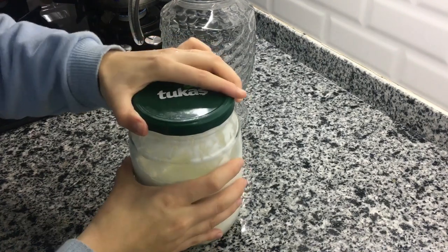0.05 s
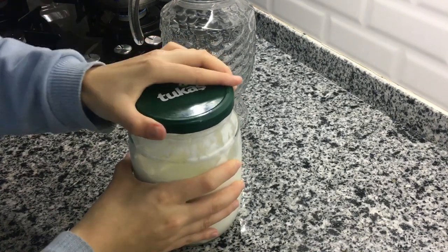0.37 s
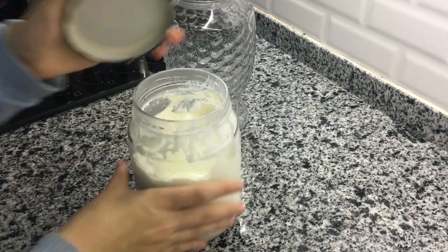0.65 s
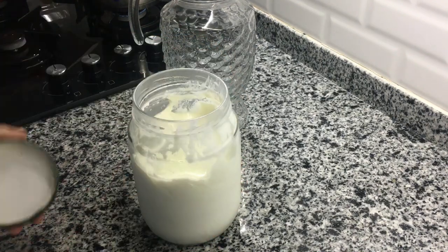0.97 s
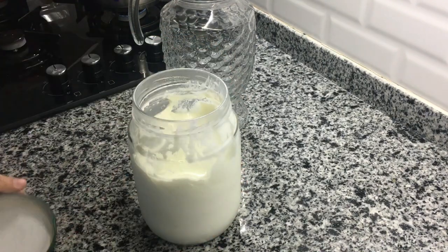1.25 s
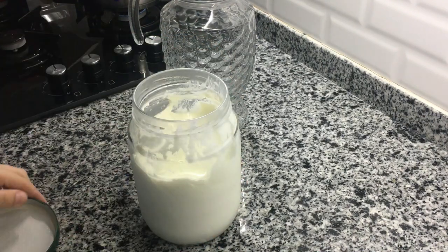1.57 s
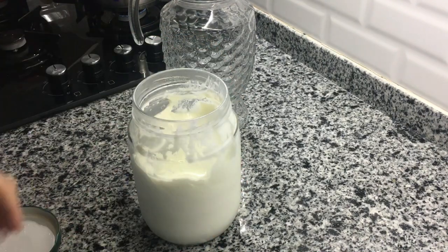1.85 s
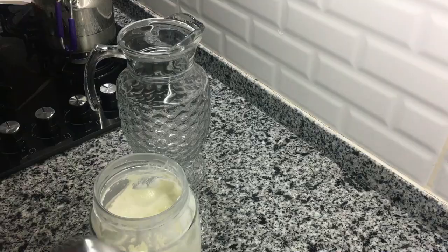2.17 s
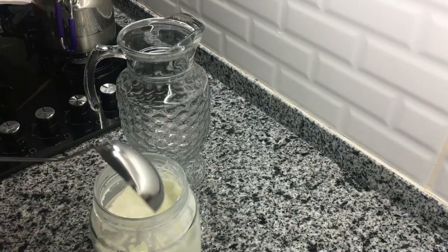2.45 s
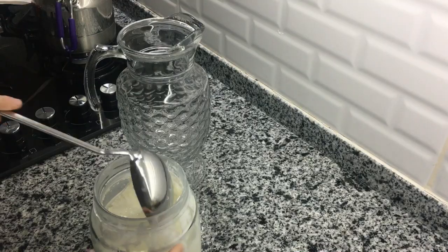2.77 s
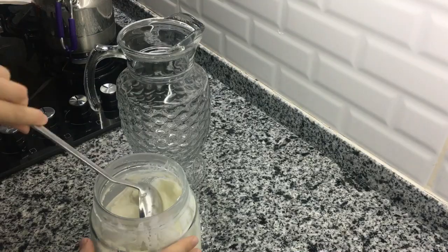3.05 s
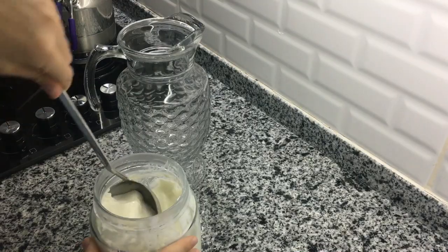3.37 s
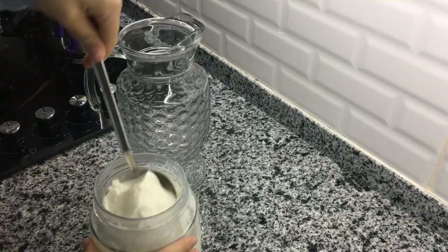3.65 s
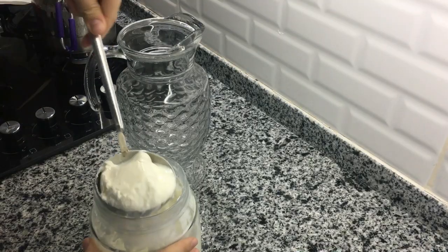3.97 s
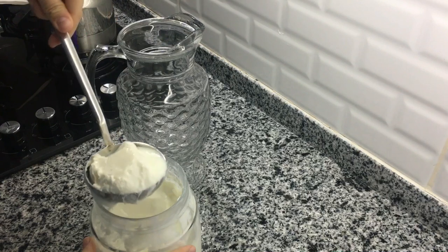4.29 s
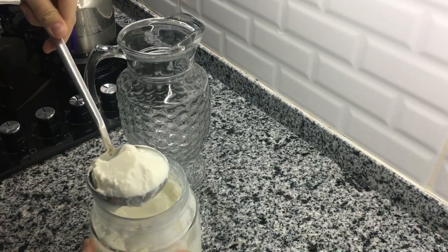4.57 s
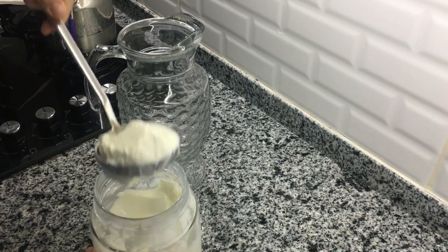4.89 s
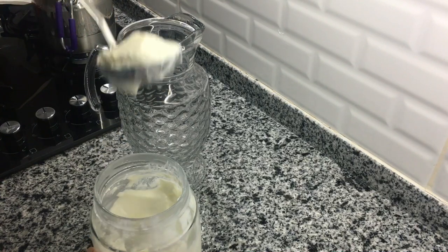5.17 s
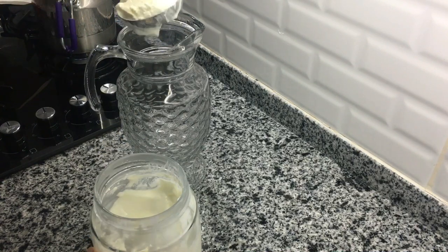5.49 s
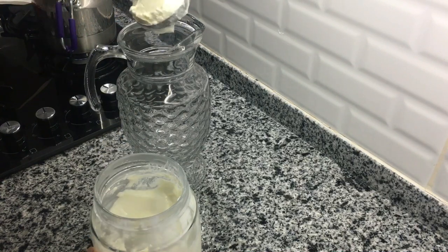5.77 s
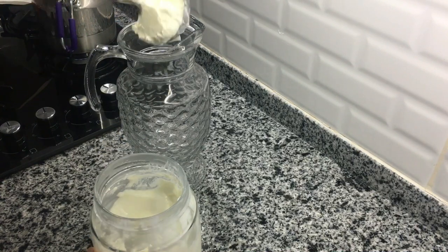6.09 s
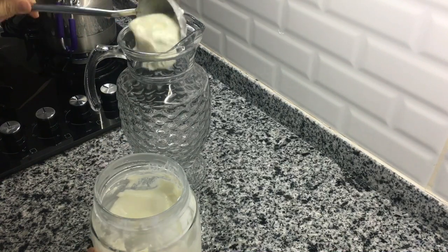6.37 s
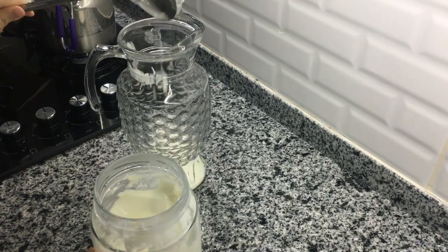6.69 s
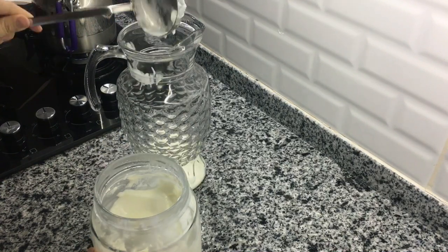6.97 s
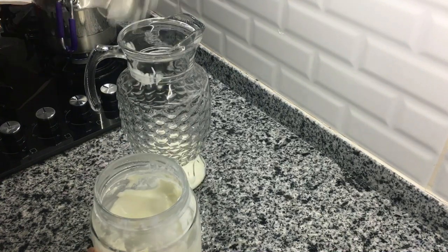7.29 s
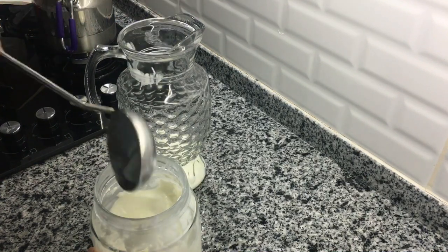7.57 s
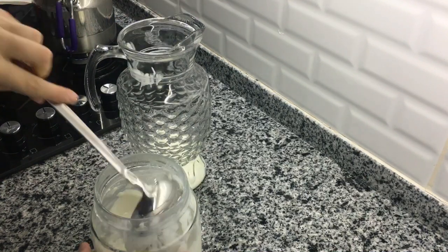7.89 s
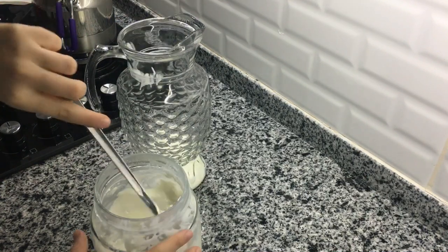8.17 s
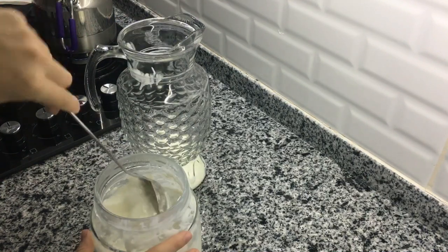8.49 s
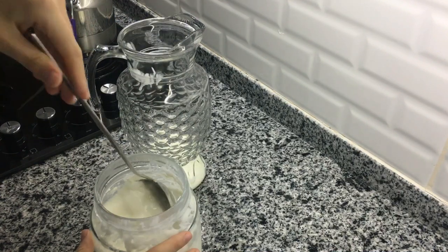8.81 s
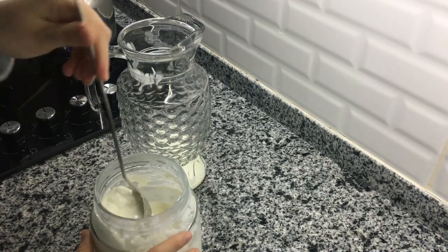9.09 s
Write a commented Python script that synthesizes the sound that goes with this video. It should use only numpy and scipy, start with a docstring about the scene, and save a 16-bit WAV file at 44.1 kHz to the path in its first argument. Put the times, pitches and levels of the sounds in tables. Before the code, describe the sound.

A jar lid pops and clatters down in a kitchen; a metal spoon knocks in the glass, and yoghurt plops into a pitcher.

```python
"""A steel serving spoon knocks and scrapes in a glass jar of yoghurt, in a tiled kitchen.
Each knock is a short clack, and then steel and glass ring on; each scrape is a run of tiny slips.
First the jar pops open and its thin tin lid clatters onto the stone counter. After the scooping,
a dollop slaps into an empty pitcher, which booms and rings, and the spoon goes back in the jar.
The tiles echo, and an appliance motor hums faintly throughout."""
import sys
import numpy as np
from scipy import signal
from scipy.fft import rfft, irfft, next_fast_len
from scipy.io import wavfile

SR = 44100
rng = np.random.default_rng(int(sys.argv[2]) if len(sys.argv) > 2 else 0)


def inscribe(sig):
    """Save sig as 16-bit PCM at rate SR to the path in sys.argv[1].

    A 1-D sig is mono; a 2-D sig holds one channel per row.
    Samples are clipped to [-1, 1] before scaling.
    """
    pcm = np.round(np.clip(np.atleast_2d(sig).T, -1, 1) * 32767)
    wavfile.write(sys.argv[1], SR, pcm.astype(np.int16))


N = 403074
BLOW_SIZE = 20480   # samples in one blow (a single hit) as it dies away
TIME, AGE = np.arange(N) / SR, np.arange(BLOW_SIZE) / SR   # seconds into the scene, and into a blow

# five pitch bands, called thud, knock, low ring, high ring and tick: (band edge [Hz])
BAND_EDGES = [100, 450, 1200, 2500, 4500, 16000]
# the middle of each band: (distance from the low ring [octaves])
BAND_OCTAVES = np.array([-3, -1.2, 0, 1, 2.3])
# the kitchen's echo; t60 is the time a sound takes to fade by 60 dB: (frequency [Hz], t60 [s])
KITCHEN_DECAY = [(100, 1), (400, 0.62), (1500, 0.49), (3000, 0.38), (6000, 0.3), (9000, 0.25),
                 (15000, 0.18)]
# the motor's steady tones: (frequency [Hz], relative level [dB])
HUM_TONES = [(48.4, -70.5), (96.9, -68), (220.7, -74), (296.1, -68), (393.0, -80.5), (985.1, -85.5),
             (1034, -81.5), (1674, -80.5), (2616, -82), (3790, -89.5)]

# A "colour" says how strong a noise is from bass to treble: (frequency [Hz], relative level [dB])
AIR_COLOUR = [(15, -39.5), (25, -7.5), (53, -1.5), (70, -13.5), (102, -2), (170, -7.5), (217, -5.5),
              (249, -10.5), (301, -2.5), (363, -13.5), (394, -9.5), (591, -16.5), (677, -15.5),
              (1650, -23.5), (5000, -33), (16000, -40)]   # room air
SLAP_COLOUR = [(100, 4), (200, 4.5), (400, -8.5), (800, -5.5), (1500, -9.5), (2700, -12.5), (4000, -10),
               (5700, -5), (6700, -1), (7500, -4), (8200, 1), (9400, 0.5), (10200, -18), (12000, -6.5),
               (16000, -10)]   # the dollop landing
LID_CLACK_COLOUR = [(50, -9), (100, 2), (250, -1.5), (375, -5), (490, -9), (900, 3), (1450, 2.5),
                    (1850, 1.5), (2150, 3.5), (2550, -2.5), (3020, 5.5), (3350, -1.5), (3650, 2),
                    (4200, -1.5), (5000, 0), (8500, -7), (10300, -15), (12000, -12.5), (16000, -21)]   # a hit on the lid
SKID_COLOUR = [(200, -20.5), (900, -8.5), (1500, 3.5), (2400, -4.5), (3400, 1), (5000, -7), (8500, -14.5),
               (10300, -22.5), (16000, -26)]   # the lid's edge skidding on stone
DRAG_COLOUR = [(120, 9), (300, 20), (450, -8), (700, 11.5), (1100, -0.5), (1500, 1), (2400, -20.5),
               (4000, -20.5), (7000, -19), (16000, -32.5)]   # dragging along the glass
GRATING_COLOUR = [(50, -7.5), (120, 3), (330, 5), (470, -4), (650, 2.5), (1000, -3), (1500, -5),
                  (2300, 0.5), (4400, -5), (6000, 2), (7800, -5), (9700, -2), (10500, -15), (11800, -1),
                  (16000, -16)]   # the spoon's edge grating over the rim
JAR_CLACK_COLOUR = [(50, -8), (120, 5), (205, 1), (330, 6.5), (470, -3.5), (650, 5), (1000, -1), (2300, -3),
                    (3400, -3.5), (4400, -5.5), (6000, -2.5), (7800, -9.5), (9700, -5.5), (10400, -16),
                    (11600, -10.5), (16000, -19.5)]   # a hit on the jar

# A "mode" is one of the tones an object rings with: (frequency [Hz], relative level [dB], t60 [s])
PITCHER_MODES = [(66, -40.5, .3), (110, -30.5, .28), (148.8, -33.5, 0.25), (1109, -35, 0.17),
                 (1800, -33, .29), (3990, -30.5, .08), (5350, -39.5, 0.2), (8290, -29, .14)]   # the empty pitcher's air and glass
BUMP_MODES = [(105, -12, .22), (165, -6.5, .18), (255, -1, 0.17), (345, -3, .1), (637, -1.5, 0.06),
              (875, -6, 0.058), (1114, -8, .06)]   # the jar rocking dully on the counter
SPOON_MODES = [(1919, -13.5, 0.14), (2054, -18.5, 0.38), (2791, -21.5, 0.099), (2930, -15, .07),
               (3140, -12, .07), (3035, -4, 0.12), (3046, -3.5, 0.11), (3100, -17, 0.25), (3062, -16, .21),
               (3008, -17, .21), (3230, -18, 0.13), (5260, -10.5, .09), (5280, -10.5, .09),
               (5330, -18, 0.2), (5830, -23, 0.19), (6050, -17.5, 0.12), (6244, -21.5, .14),
               (6310, -25.5, .14), (6930, -37.5, .18), (8230, -29.5, 0.18), (11366, -14, 0.061),
               (11536, -18, 0.066), (11851, -17.5, 0.065), (12110, -18.5, 0.064), (12946, -19, .06)]   # the steel spoon
# modes that depend on the spot hit: (frequency [Hz], relative level [dB], t60 [s], best spots [names])
LID_MODES = [(388, -14.5, 0.24, "face"), (609, -26.5, 0.22, "face edge"), (1114, -12, 0.08, "skirt edge"),
             (1364, -5, .08, "skirt"), (1423, -0.5, .075, "edge"), (1460, -16.5, 0.24, "face edge"),
             (1467, -0.5, .105, "face"), (1490, -10, .07, "face edge"), (1723, -9.5, 0.085, "face"),
             (2133, -5.5, 0.079, "skirt edge"), (2340, -3, 0.072, "skirt"), (2840, -6, .065, "face edge"),
             (2910, -8, .07, "face"), (3015, 0.5, .065, "edge skirt face"), (3079, 5.5, 0.084, "face"),
             (3110, -4, .075, "skirt face"), (3571, -8, 0.11, "face skirt"), (3630, -10, 0.12, "edge"),
             (3680, -9.5, .13, "face skirt"), (3800, -4.5, 0.078, "skirt"), (4158, -13.5, .12, "face"),
             (4581, -11, .09, "edge"), (4640, -8.5, .1, "face"), (4766, -11, .07, "skirt"),
             (5011, -9, 0.089, "face"), (5220, -10.5, 0.07, "face skirt"), (5920, -2, 0.12, "lug"),
             (6860, -10.5, .1, "face"), (7400, -10, 0.084, "lug"), (8260, -18, 0.061, "face edge"),
             (8669, -11.5, .14, "lug"), (12200, -20, .06, "skirt")]   # the tin lid
JAR_MODES = [(622, -1.5, 0.1204, "base"), (646.6, -5.5, 0.099, "rim shoulder side wall mouth"),
             (890, -8.5, 0.102, "shoulder base"), (1118, -7, 0.12, "shoulder"),
             (1423, -4.5, 0.1404, "neck"), (1464, -2.5, .27, "rim lip"),
             (1512, 2, .22, "shoulder base mouth lip"), (1547, -2.5, .18, "neck base"),
             (1693, -4, 0.067, "rim"), (1999, -3, .13, "neck"), (2057, -4, .33, "side"),
             (2186, -3.5, .11, "base"), (2300, -1.5, 0.051, "wall rim"), (2410, 1, 0.045, "rim"),
             (2640, -2.5, .09, "base"), (2950, -4.5, 0.05, "wall lip rim"), (3046, -1.5, .09, "base"),
             (3074, -2, 0.16, "neck shoulder"), (3113, -0.5, .08, "neck base"), (3260, -3, .054, "wall"),
             (3600, -5, .07, "wall"), (3809, 3.5, .08, "rim"), (4037, 1, .065, "base"),
             (4130, -9.5, .07, "wall neck"), (4520, -2, .06, "rim"), (4723, -7, .07, "base"),
             (4831, -5, .085, "shoulder"), (5150, -7, .09, "neck wall"), (5555, -1.5, .075, "base"),
             (5862, -9, 0.097, "shoulder base"), (6030, -4, .09, "rim"),
             (6040, -3, .1, "neck shoulder base"), (6290, 1, .085, "base"), (6390, -2.5, .07, "base"),
             (6659, -5.5, .07, "rim"), (7000, -7.5, .08, "shoulder"), (7100, -7, .07, "rim"),
             (7221, -7, .07, "base"), (8357, -6.5, 0.0698, "base"), (8530, -6.5, 0.089, "shoulder base"),
             (8700, -3, .08, "rim"), (9210, -9, 0.091, "shoulder"), (9275, -10.5, 0.073, "shoulder"),
             (9650, -6.5, .1, "rim shoulder"), (9976, -10.5, .07, "base shoulder"),
             (10090, -10.5, .07, "rim"), (11430, -11.5, .07, "rim shoulder"), (11680, -4, .085, "rim"),
             (11860, -8.5, .06, "rim neck"), (12240, -12.5, .08, "rim shoulder base"),
             (13606, -11, 0.0801, "neck"), (14088, -15, .06, "rim base")]   # the glass jar, damped by its filling
NEAR_NODE_DB = -17   # a mode is this much weaker when hit anywhere else, where it barely moves

# the dollop's slap in each band, from thud to tick: (level [dB])
SLAP_BAND_DB = [-40.5, -47, -41.5, -35.5, -24.5]
# air pockets bursting under the dollop: (time [s], starting pitch [Hz], level [dB])
BUBBLES = [(6.699, 1497, -21.5), (6.705, 1750, -20), (6.719, 2120, -29)]

# the loosened lid bumping the held jar: (time [s], level [dB])
BUMPS = [(0.207, -10), (0.446, -16.5), (0.668, -21.5)]
# the lid twisted off, then set down on stone: (time [s], part hit [name], strength [dB],
# hardness [dB per octave], extra tick [dB], chatter time [s], extra ring [dB])
LID_BLOWS = [(0.0968, "edge", -64.5, -4, -19, .0025, -2), (0.1801, "edge", -41.5, 0, -9.5, 0.004, 3),
             (0.197, "skirt", -48.5, -3.5, -4.5, 0.0098, -7), (0.4246, "skirt", -57.5, -4, -11.5, .006, -4),
             (0.439, "face", -56, -3.5, -24, .014, -3.5), (0.666, "skirt", -65.5, -6, -6, 0.013, -16),
             (0.908, "skirt", -60, -1, -13, .0017, -17), (1.215, "edge", -38.5, 8, -7, .003, -3.5),
             (1.3329, "lug", -54.5, 1.5, 3.5, .003, 4), (1.38, "face", -33, 9, -10, .0064, 3.5),
             (1.388, "face", -40.5, 6.5, -7.5, .003, 1), (1.398, "face", -35.5, 9, -8.5, .004, 1),
             (1.411, "face", -38.5, 6.5, -4.5, .006, -1), (1.628, "skirt", -47, 6, -3, .0054, -6),
             (1.637, "skirt", -43.5, 6.5, -8, .0054, -5), (1.6708, "skirt", -42.5, 5.5, 2, .003, -5),
             (1.6792, "skirt", -38, 5.5, -5.5, 0.0017, -0.5), (2.169, "skirt", -70.5, 7, -4, 0.049, -25.5)]
LID_BALANCE_DB = [-1.5, -4.5, -1, -2.5]   # bands from thud to high ring, at zero hardness
LID_TILT_TOP_OCTAVES = 0.77   # hardness adds no further lift beyond this far above the low ring
LID_OFF_S, GRIPPED_RING_SHARE = .8, 0.22   # until the lid is off, the hand shortens its ring

# the spoon sucking free or sliding down the wall:
# (time [s], level [dB], rise [s], fall [s], starting pitch [Hz], final pitch [Hz])
SQUEAKS = [(3.535, -41.5, 0.078, 0.077, 742, 622), (7.927, -43, 0.011, 0.1, 1515, 1200)]
# spoon strokes through yoghurt along the glass: (time [s], level [dB], rise [s], hold [s], fall [s])
STROKES = [(3.08, -59, 0.25, .37, 0.22), (7.797, -48, 0.053, 0.082, 0.094), (8.0, -58, .04, 0.21, 0.48)]
# how the jar answers at each named place: (glass ring [dB], extra knock [dB], ring time kept [share])
JAR_PLACES = {"rim": (4.4, 0.44, 0.83), "neck": (5.7, -6, 0.86), "lip": (8, -4, 0.43),
              "mouth": (2.75, 1.6, 0.88), "shoulder": (6.1, 1.6, 0.89), "side": (1, 0.95, 0.83),
              "wall": (2, -1.5, 0.63), "base": (5, 0, 0.79)}
# knocks on the jar, mostly from the spoon; at 2.9 s a soft low thud as the hand grips it.
# Yoghurt softens a hit, and a downward push thuds on the counter:
# (time [s], place [name], strength [dB], hardness [dB per octave], extra thud [dB], chatter time [s],
# extra steel ring [dB], edge brightness [dB per octave])
JAR_BLOWS = [(2.487, "rim", -34.5, 2, -3.5, 0.0045, -13.5, 6.5),
             (2.5914, "rim", -43.5, 3, 0, 0.0037, -11.5, 4), (2.9042, "wall", -74, 0, 21, 0.0027, -13, -7),
             (3.0513, "neck", -38, -1, -5.5, .0042, 2, 1.5), (3.237, "neck", -51, .5, 2, 0.0059, -9, -5.5),
             (3.2665, "wall", -53, -5, -9, .012, 2.5, -13), (3.3846, "lip", -52, -6, -9, 0.0036, -8.5, -4),
             (3.4502, "lip", -55.5, -8.5, -10, 0.0018, -15, -5),
             (3.478, "lip", -55, -5, -4, 0.0018, -4, -4), (3.602, "mouth", -51.5, -7, -9, .018, -21, -8),
             (3.6437, "shoulder", -58, -3.5, 5, 0.0036, -2, -2),
             (3.723, "base", -56.5, -4, 7.5, 0.0097, 2, -14),
             (3.8135, "wall", -67.5, 3.5, -6, 0.0019, -4, -1),
             (4.0459, "mouth", -29, -1.13, -13, 0.0052, 11, 1),
             (7.7622, "shoulder", -34.5, -1.5, -5.5, 0.0039, -17.5, 3.5),
             (7.9302, "side", -57, -2.5, 0, 0.01, -4, -19), (7.955, "side", -55.5, -3.5, -2, 0.011, -9, -8),
             (7.9868, "side", -52, -8.5, 3.5, 0.015, -14, -9), (8.088, "rim", -72.5, 3, -3, .004, -20, 17),
             (8.106, "wall", -48, -12, -10, 0.0021, -22, -3), (8.14, "wall", -63, -2, 9, 0.0065, -19, 9),
             (8.284, "wall", -45.5, -3, -4.5, 0.0024, -8, -16),
             (8.671, "wall", -58, -5, 1, 0.0065, -20, -2), (9.0415, "base", -39, 2, -10, 0.0076, -13, -1.5),
             (9.101, "base", -34.5, .9, -13.5, 0.0061, -17, -2)]
JAR_BALANCE_DB = [-7.5, -0.5, 3, -0.5]   # bands from knock to tick
STEEL_BAND_SHIFT = [-0.26, -0.033, 0.46, -0.039]   # dB added to those bands per dB of extra steel ring
STEEL_DB_PER_DOUBLING = 79.5   # a freely bouncing spoon rings longer: this much extra doubles its t60


def from_db(db):
    """Turn decibels into a number to multiply a sound by."""
    return 10 ** (np.asarray(db) / 20)


def rms_one(sound):
    """Scale a sound so its average size (rms) is 1."""
    return sound / np.sqrt(np.mean(sound ** 2) + 1e-30)


def energy_one(sound):
    """Scale a sound so its total energy is 1."""
    return rms_one(sound) / np.sqrt(len(sound))


def at_hz(table, hz):
    """Look up a frequency in a table, blending between rows on a pitch scale."""
    table = np.array(table)
    return np.interp(np.log(np.maximum(hz, 1)), np.log(table[:, 0]), table[:, 1])


def fade(t60):
    """A curve that starts at 1 and falls by 60 dB every t60 seconds."""
    return np.exp(-np.log(1000) * AGE / max(t60, 1e-4))


def swell(time, start_s, level_db, rise_s, hold_s, fall_s):
    """The loudness of one movement: it rises, holds and falls."""
    corners = start_s + np.cumsum([0, rise_s, hold_s, fall_s])
    return from_db(level_db) * np.interp(time, corners, [0, 1, 1, 0])


def noise(colour, size):
    """Random noise with the given colour."""
    gain = from_db(at_hz(colour, np.fft.rfftfreq(size, 1 / SR)))
    return rms_one(irfft(rfft(rng.standard_normal(size)) * gain, size))


def through(sound, response):
    """Let every sample of a sound set off a response, such as an echo."""
    return signal.oaconvolve(sound, response)[:len(sound)]


def with_echo(sound, echo, room_db):
    """A sound plus the room's answer to it."""
    return sound + from_db(room_db) * through(sound, echo)


def add(track, start_s, sound):
    """Mix a sound into the track at the given time."""
    start = round(start_s * SR)
    track[start:start + len(sound)] += sound[:N - start]


def chatter(length_s, per_s, strength, first):
    """A first touch, then tiny random bounces that die away."""
    touches = (rng.random(BLOW_SIZE) < per_s / SR) * rng.normal(0, strength, BLOW_SIZE)
    touches *= np.exp(-(AGE / length_s) ** 2)
    touches[0] = first
    return touches


def clack(colour, t60, rise_s, touches):
    """Many short-lived tones blur into a burst of noise; reflections off the counter swell it quickly."""
    one_touch = fade(t60) * (1 - fade(rise_s))
    energy = through(touches ** 2, one_touch ** 2)
    return energy_one(noise(colour, BLOW_SIZE) * np.sqrt(np.abs(energy)))


def modes_at(modes, spot):
    """An object's modes when hit at one spot: some ring fully, the rest weakly."""
    return [(hz, level_db + (0 if spot in best_spots else NEAR_NODE_DB), t60)
            for hz, level_db, t60, best_spots in modes]


def ringing(modes, touches, spread_db, pitch=1, t60_scale=1):
    """Each mode gathers energy from the touches and fades; modes close in pitch throb together."""
    out, energy = np.zeros(BLOW_SIZE), touches ** 2 + 1e-18
    for hz, level_db, t60 in modes:
        t60 *= t60_scale
        size = int((t60 + .05) * SR)
        kept_per_sample = np.exp(-2 * np.log(1000) / (t60 * SR))
        swing = np.sqrt(signal.lfilter([1], [1, -kept_per_sample], energy[:size]))
        tone = np.sin(2 * np.pi * hz * pitch * AGE[:size])
        out[:size] += from_db(level_db + spread_db * rng.normal()) * swing * tone
    return energy_one(out)


def hollow_note(from_hz, to_hz, level_db, t60, glide_t60):
    """Enclosed air rings briefly; its pitch can slide as its opening changes."""
    hz = to_hz + (from_hz - to_hz) * fade(glide_t60)
    return from_db(level_db) * fade(t60) * (1 - fade(0.008)) * np.sin(2 * np.pi * np.cumsum(hz) / SR)


def set_bands(blow, levels_db):
    """Turn each band up or down towards the wanted level for the blow's first 40 ms."""
    size = int(.04 * SR)
    hz, edges = np.fft.rfftfreq(BLOW_SIZE, 1 / SR), np.array(BAND_EDGES)
    power = 2 * np.abs(rfft(blow[:size], BLOW_SIZE)) ** 2 / (size * BLOW_SIZE)
    own_db = 10 * np.log10(np.histogram(hz, edges, weights=power)[0] + 1e-20)
    flat_ends_hz = np.column_stack([edges[:-1] * 1.15, edges[1:] / 1.15]).ravel()
    gain_table = np.column_stack([flat_ends_hz, np.repeat(levels_db - own_db, 2)])
    log_gain = np.log(from_db(at_hz(gain_table, hz)))
    # a "minimum phase" filter, so nothing sounds before the hit
    cepstrum = irfft(log_gain)[:BLOW_SIZE // 2]
    return irfft(rfft(blow) * np.exp(2 * rfft(cepstrum, BLOW_SIZE) - cepstrum[0]))


def air_and_hum(air_db, hum_gain_db, waver_radians):
    """Steady room air and the slightly wavering tones of a motor."""
    out = from_db(air_db) * noise(AIR_COLOUR, next_fast_len(N))[:N]
    step_times = np.linspace(0, TIME[-1], 60)
    for hz, level_db in HUM_TONES:
        wander = np.interp(TIME, step_times, np.cumsum(rng.normal(0, waver_radians, len(step_times))))
        out += from_db(level_db + hum_gain_db) * np.sqrt(2) * np.sin(2 * np.pi * hz * TIME + wander)
    return out


def kitchen_echo(build_s):
    """Tiles and stone scatter sound into an echo that builds up, then dies, treble first."""
    hz = np.fft.rfftfreq(BLOW_SIZE, 1 / SR)
    white = np.exp(2j * np.pi * rng.random(len(hz)))
    edges = np.r_[0, np.geomspace(150, SR / 2, 12)]
    tail = sum(irfft(white * (hz >= low) * (hz < high)) * fade(at_hz(KITCHEN_DECAY, (low + high) / 2))
               for low, high in zip(edges, edges[1:]))
    return energy_one(tail * (1 - np.exp(-AGE / build_s)))


def arm_swish(start_s, level_db, start_hz, sink_octaves_per_s, width_octaves):
    """A dull rustle as the arm swings over; it sinks in pitch as the movement slows."""
    out, age = np.zeros(N), TIME[:SR]
    loudness = swell(age, 0, level_db, rise_s=0.14, hold_s=0.061, fall_s=0.6)
    centre_hz = start_hz * 2 ** (-sink_octaves_per_s * age)
    for hz in (70, 140, 280, 560, 1120):
        octave = signal.butter(2, [hz / np.sqrt(2), hz * np.sqrt(2)], "band", fs=SR, output="sos")
        rustle = rms_one(signal.sosfilt(octave, rng.standard_normal(SR)))
        off_centre = np.log2(hz / centre_hz) / width_octaves
        add(out, start_s, loudness * rustle / (1 + off_centre ** 2))
    return out


def pitcher(echo, start_s, bubble_rise, bubble_t60, room_db):
    """Air pockets plop from under the dollop, rising in pitch, and the pitcher booms and rings."""
    out = np.zeros(N)
    for burst_s, hz, level_db in BUBBLES:
        add(out, burst_s, hollow_note(hz, hz * bubble_rise, level_db, bubble_t60, bubble_t60))
    for hz, level_db, t60 in PITCHER_MODES:
        add(out, start_s, hollow_note(hz, hz, level_db, t60, t60))
    return with_echo(out, echo, room_db)


def dollop(echo, start_s, slap_t60, room_db):
    """Yoghurt slaps the pitcher's floor in a quick spatter."""
    out = np.zeros(N)
    spatter = chatter(length_s=0.0039, per_s=2000, strength=0.83, first=.6)
    slap = clack(SLAP_COLOUR, slap_t60, rise_s=.012, touches=spatter)
    add(out, start_s, set_bands(with_echo(slap, echo, room_db), SLAP_BAND_DB))
    return out


def jar_bumps(echo, room_db):
    """Soft knocks on the held jar wake only its lowest tones."""
    out = np.zeros(N)
    for start_s, level_db in BUMPS:
        touches = chatter(length_s=0.0075, per_s=680, strength=.8, first=.4)
        add(out, start_s, from_db(level_db) * ringing(BUMP_MODES, touches, spread_db=2.5, pitch=0.99))
    return with_echo(out, echo, room_db)


def seal_pop(echo, start_s, room_db):
    """The seal lets go with a hollow pop."""
    out = np.zeros(N)
    add(out, start_s, hollow_note(from_hz=359, to_hz=389, level_db=-19.5, t60=0.086, glide_t60=0.11))
    return with_echo(out, echo, room_db)


def lid_clatter(echo, clack_t60, ring_db, clack_room_db, ring_room_db):
    """The thin lid clacks and rings on glass and stone; a harder hit gives less thud and more ring."""
    out = np.zeros(N)
    for start_s, part, strength_db, hardness, tick_db, chatter_s, extra_ring_db in LID_BLOWS:
        touches = chatter(chatter_s, per_s=1000, strength=0.79, first=0.88)
        hit = clack(LID_CLACK_COLOUR, clack_t60, rise_s=.002, touches=touches)
        ring_share = GRIPPED_RING_SHARE if start_s < LID_OFF_S else 1
        tin = ringing(modes_at(LID_MODES, part), touches, spread_db=3.5, t60_scale=ring_share)
        ring = from_db(ring_db + extra_ring_db) * tin
        room = through(from_db(clack_room_db) * hit + from_db(ring_room_db) * ring, echo)
        tilt_db = hardness * np.minimum(BAND_OCTAVES[:-1], LID_TILT_TOP_OCTAVES)
        levels_db = strength_db + np.r_[LID_BALANCE_DB + tilt_db, tick_db]
        add(out, start_s, set_bands(hit + ring + room, levels_db))
    return out


def wet_squeaks(settle_s, width_share):
    """Wet rubbing makes a rough note that falls as the gap behind the spoon opens."""
    out = np.zeros(N)
    for start_s, level_db, rise_s, fall_s, from_hz, to_hz in SQUEAKS:
        hz = to_hz + (from_hz - to_hz) * np.exp(-AGE / settle_s)
        tone = np.sin(2 * np.pi * np.cumsum(hz) / SR)
        smoothing = signal.butter(2, width_share * to_hz, fs=SR, output="sos")
        roughness = rms_one(signal.sosfilt(smoothing, rng.standard_normal(BLOW_SIZE)))
        add(out, start_s, swell(AGE, 0, level_db, rise_s, 0, fall_s) * roughness * tone)
    return out


def scrape(echo, loudness, modes, colour, slips_per_s, ring_db, room_db):
    """Each tiny slip clacks and makes the object ring; the surface, wet or dry, colours both."""
    slips = (rng.random(N) < slips_per_s / SR) * rng.standard_normal(N)
    coloured_modes = [(hz, level_db + at_hz(colour, hz), t60) for hz, level_db, t60 in modes]
    tiny_clack = energy_one(noise(colour, BLOW_SIZE) * fade(0.062))
    ring = from_db(ring_db) * ringing(coloured_modes, touches=AGE == 0, spread_db=2.0)
    rub = loudness * rms_one(through(slips, tiny_clack + ring))
    return with_echo(rub, echo, room_db)


def spoon_edge(blow, db_per_octave, corner_hz):
    """Raise or lower the treble: the spoon's sharp edge sounds brighter than its round back."""
    hz = np.fft.rfftfreq(BLOW_SIZE, 1 / SR)
    octaves_above = np.log2(1 + (hz / corner_hz) ** 4) / 4
    tilted = irfft(rfft(blow) * from_db(db_per_octave * octaves_above))
    return tilted * (AGE < AGE[-1] * .9)   # silence the end, where the filter leaves a stray click


def jar_knocks(echo, clack_t60, steel_db, clack_room_db, ring_room_db):
    """The filled jar gives a short clack while steel and glass ring on; the spot picks the glass tones."""
    out = np.zeros(N)
    for start_s, place, strength_db, hardness, thud_db, chatter_s, extra_db, brightness in JAR_BLOWS:
        glass_db, knock_db, ring_share = JAR_PLACES[place]
        touches = chatter(chatter_s, per_s=1694, strength=0.87, first=0.53)
        hit = clack(JAR_CLACK_COLOUR, clack_t60, rise_s=0.00397, touches=touches)
        steel_stretch = 2 ** (extra_db / STEEL_DB_PER_DOUBLING)
        steel = ringing(SPOON_MODES, touches, spread_db=0, t60_scale=steel_stretch)
        glass = ringing(modes_at(JAR_MODES, place), touches, spread_db=2.5, t60_scale=ring_share)
        ring = from_db(steel_db + extra_db) * steel + from_db(glass_db) * glass
        room = through(from_db(clack_room_db) * hit + from_db(ring_room_db) * ring, echo)
        blow = spoon_edge(hit + ring + room, brightness, corner_hz=4500)
        # hardness lifts the treble, and freely ringing steel trades knock for high ring
        tilt_db = np.r_[knock_db, hardness * BAND_OCTAVES[2:]]
        balance_db = JAR_BALANCE_DB + tilt_db + extra_db * np.array(STEEL_BAND_SHIFT)
        add(out, start_s, set_bands(blow, strength_db + np.r_[thud_db, balance_db]))
    return out


def scene():
    """Mix all the sources in one kitchen, as a single channel."""
    echo = kitchen_echo(build_s=0.0042)
    out = lid_clatter(echo, clack_t60=0.042, ring_db=6.0, clack_room_db=-5.5, ring_room_db=-7.5)
    out += seal_pop(echo, start_s=.206, room_db=-10.5)
    out += jar_bumps(echo, room_db=-4.5)
    out += jar_knocks(echo, clack_t60=0.055, steel_db=5.5, clack_room_db=-5.5, ring_room_db=-9.5)
    out += dollop(echo, start_s=6.698, slap_t60=0.046, room_db=-8.5)
    out += pitcher(echo, start_s=6.698, bubble_rise=1.14, bubble_t60=.05, room_db=-13.0)
    spoon_strokes = sum(swell(TIME, *stroke) for stroke in STROKES)
    lid_unscrewing = swell(TIME, start_s=0.38, level_db=-51, rise_s=0.037, hold_s=0.0092, fall_s=0.08)
    out += scrape(echo, spoon_strokes + lid_unscrewing, modes_at(JAR_MODES, "shoulder"), DRAG_COLOUR,
                  slips_per_s=500, ring_db=-9.5, room_db=-5.5)
    rim_grating = swell(TIME, start_s=2.594, level_db=-42.0, rise_s=0.022, hold_s=0.042, fall_s=0.09)
    out += scrape(echo, rim_grating, modes_at(JAR_MODES, "rim"), GRATING_COLOUR,
                  slips_per_s=900, ring_db=-2.0, room_db=-10.0)
    lid_skid = swell(TIME, start_s=1.253, level_db=-46, rise_s=.02, hold_s=.025, fall_s=.05)
    out += scrape(echo, lid_skid, modes_at(LID_MODES, "edge"), SKID_COLOUR,
                  slips_per_s=810, ring_db=-4.5, room_db=-4)
    out += wet_squeaks(settle_s=0.0487, width_share=0.06)
    out += arm_swish(start_s=4.86, level_db=-51, start_hz=370, sink_octaves_per_s=6.1, width_octaves=0.97)
    out += air_and_hum(air_db=-60, hum_gain_db=-0.5, waver_radians=0.59)
    return out[None]


def record(dry):
    """Cut the deepest bass (below 42 Hz) and the highest treble (above 16000 Hz)."""
    bass_cut = signal.butter(8, 42, "high", fs=SR, output="sos")
    treble_cut = signal.ellip(10, .2, 70, 16000, fs=SR, output="sos")
    return signal.sosfilt(treble_cut, signal.sosfilt(bass_cut, dry))


dry = scene()
out = record(dry)
inscribe(out)
```